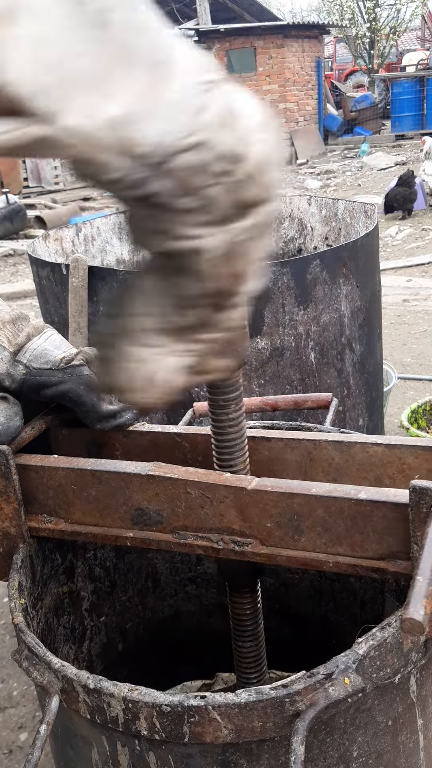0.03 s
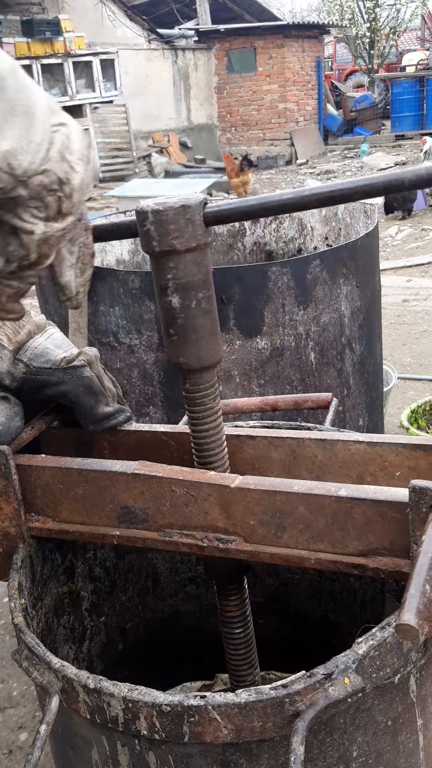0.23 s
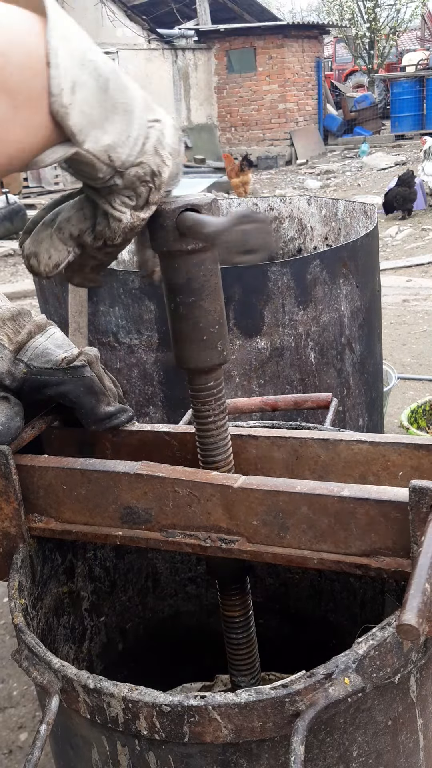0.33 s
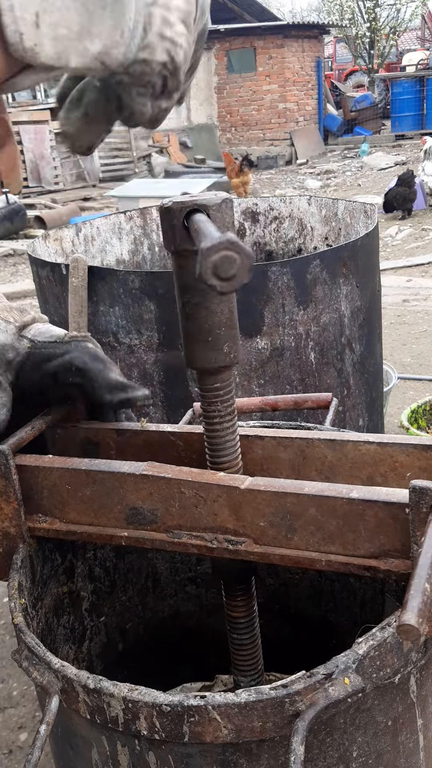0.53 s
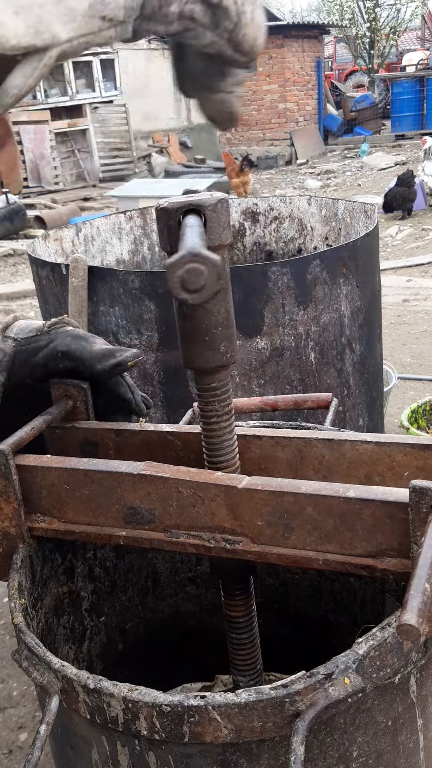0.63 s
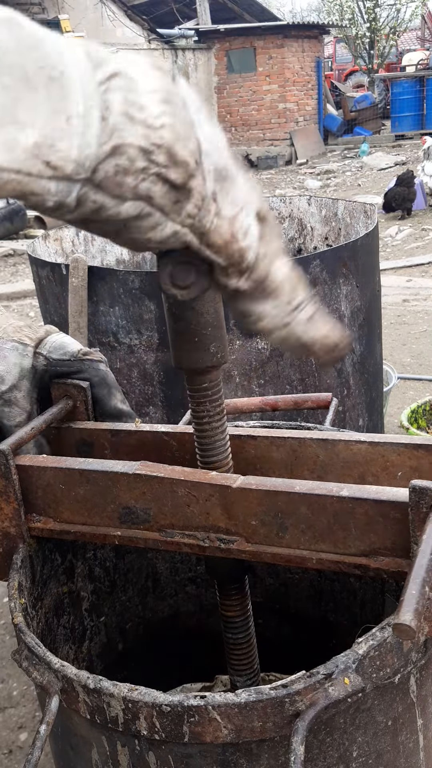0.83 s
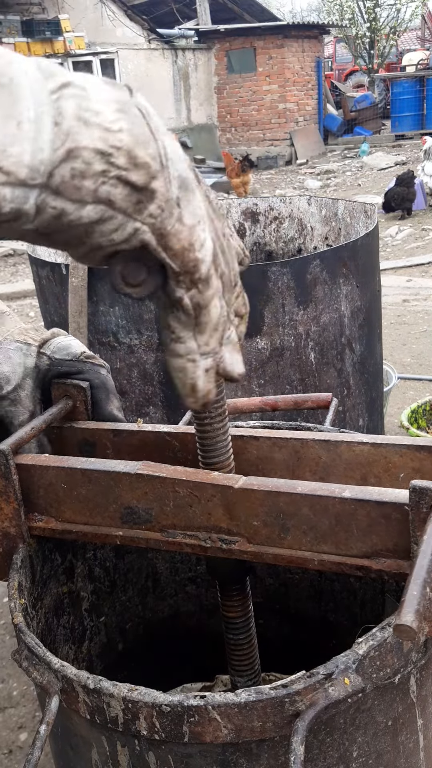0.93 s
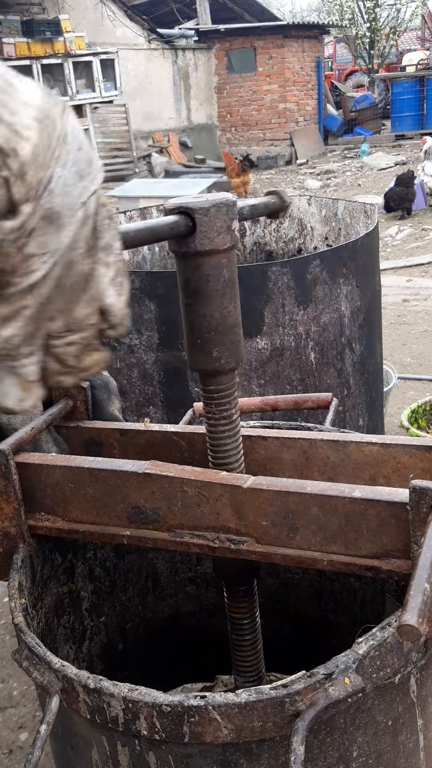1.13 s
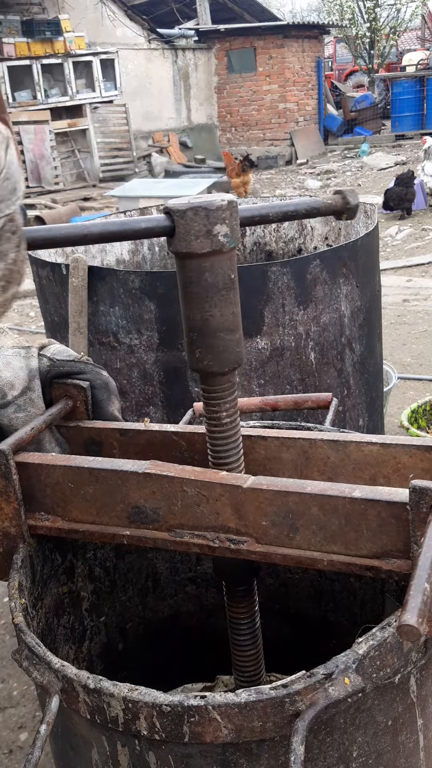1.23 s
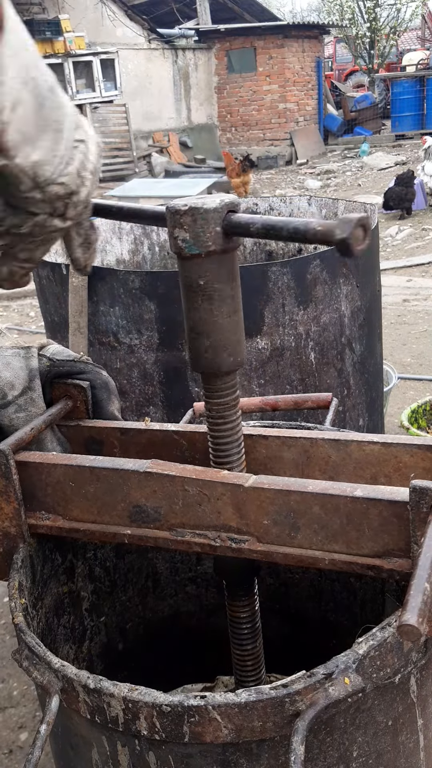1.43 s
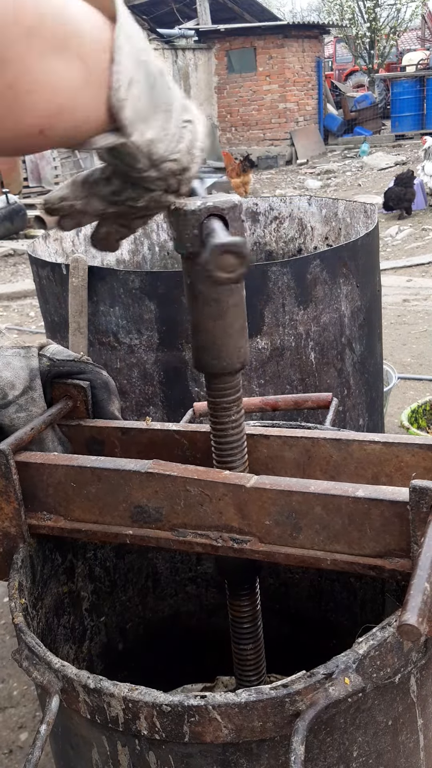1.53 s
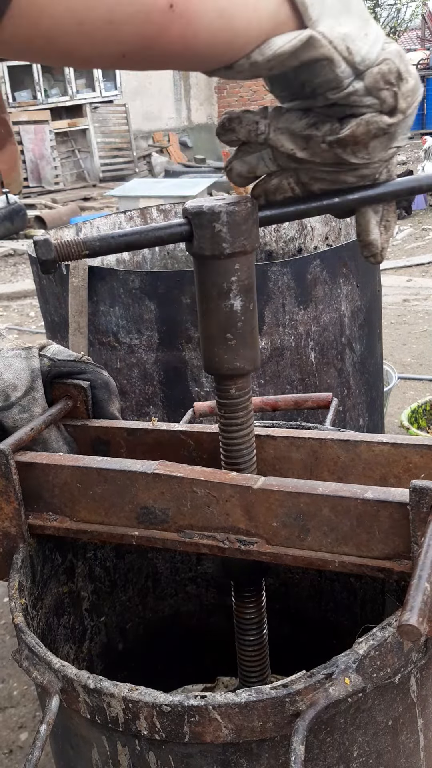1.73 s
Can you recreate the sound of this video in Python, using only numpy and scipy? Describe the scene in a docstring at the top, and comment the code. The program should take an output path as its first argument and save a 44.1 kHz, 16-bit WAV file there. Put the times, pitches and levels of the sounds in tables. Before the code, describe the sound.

A screw press's steel handle knocks and clatters dully in its socket as it spins.

```python
"""The loose bar handle of a rusty screw press knocks in its socket as a gloved hand spins it.
Each impact excites the damped modes of the steel frame, which rings dully and clatters.
Friction makes the thread grind and the glove swish close by; the drum bumps and fine ticks sound.
Under it lies a low rumble of handling or wind. A bird chirps twice over the faint hush of a farmyard."""
import sys
import numpy as np
from scipy import signal
from scipy.io import wavfile
from scipy.ndimage import uniform_filter1d

SR = 44100
rng = np.random.default_rng(int(sys.argv[2]) if len(sys.argv) > 2 else 0)


def wrap_up_sound(samples):
    """Save the sound to the file named by the first command line argument, as 16-bit audio."""
    columns = np.atleast_2d(samples).T
    # keep every value between -1 and 1, then stretch to whole-number steps
    tamed = np.clip(columns, -1, 1)
    steps = np.round(tamed * 32767).astype(np.int16)
    wavfile.write(sys.argv[1], SR, steps)


N = 79380
TIME = np.arange(N) / SR
CUTOFF_HZ = 15900
EDGES_HZ = np.geomspace(25, 17000, 23)
CENTRES_HZ = np.sqrt(EDGES_HZ[1:] * EDGES_HZ[:-1])


def from_db(db):
    """Amplitude grows tenfold for every 20 dB."""
    return 10 ** (np.asarray(db) / 20)


def panned(db):
    """A level difference between the ears gives direction; positive is to the left."""
    return from_db(db * np.array([[.5], [-.5]]))


def level_curve(rows):
    """Gain over time, interpolated in decibels."""
    return from_db(np.interp(TIME, *np.transpose(rows)))


def at_hz(points, hz):
    """Interpolation on a logarithmic frequency axis."""
    f, value = np.transpose(points)
    return np.interp(np.log(hz), np.log(f), value)


def decay(t, t60):
    """Damping lowers a vibration exponentially, by 60 dB in t60 seconds."""
    return np.exp(-np.log(1000) * t / t60)


def roughness(depth_db, rate_hz):
    """Random amplitude modulation is heard as roughness."""
    knots = rng.standard_normal(2000)
    return from_db(depth_db * np.interp(TIME * rate_hz, np.arange(len(knots)), knots))


def unit_rms(x):
    """Normalisation to unit mean power."""
    return x / np.sqrt(np.mean(x ** 2) + 1e-20)


def noise_bands(spectrum, correlation):
    """Stereo noise as (band, channel, sample); the mid-to-side ratio sets left-right correlation."""
    white, bands = rng.standard_normal((2, 2, N)), []
    gains = from_db(at_hz(spectrum, CENTRES_HZ)) * np.sqrt(np.diff(EDGES_HZ))
    alike = correlation * np.ones(len(gains))
    for k, gain in enumerate(gains / np.linalg.norm(gains)):
        band = signal.butter(2, EDGES_HZ[k:k + 2], "band", fs=SR, output="sos")
        mid, side = signal.sosfilt(band, white[k % 2])
        stereo = np.sqrt(1 + alike[k]) * mid + np.sqrt(1 - alike[k]) * np.array([side, -side])
        bands.append(gain * unit_rms(stereo))
    return np.array(bands)


def add(out, start_s, sound):
    """Superposition of a sound on the mix from its start time."""
    i = int(start_s * SR)
    out[..., i:i + sound.shape[-1]] += sound[..., :N - i]


# Each row: frequency in Hz, relative spectral density in dB.
HUSH_SPECTRUM = [(25, -16), (80, -14.5), (300, -6.5), (700, 2.5), (1500, -15), (3000, -10), (6000, -12.5),
                 (8500, -46), (15500, -44)]

def yard_hush():
    """The steady background is diffuse: it is nearly uncorrelated at the two ears."""
    return from_db(-60.5) * noise_bands(HUSH_SPECTRUM, correlation=0.11).sum(0)


# Each row: time in seconds, level in dB.
GRIND_LEVEL = [(0, -52.5), (.08, -42), (.35, -48.5), (.6, -55), (.76, -51.5), (.8, -57), (.9, -49),
               (1.02, -36.5), (1.12, -54.5), (1.28, -51.5), (1.42, -55.5), (1.6, -54), (1.8, -60.5)]
# Each row: frequency in Hz, relative spectral density in dB.
GRIND_SPECTRUM = [(150, -22.5), (320, 4), (500, 4.5), (750, -5), (1000, -2.5), (1350, -9), (2000, -19),
                  (4000, -38), (8000, -53)]
# Each row: frequency in Hz, left-right correlation of the grinding and of the frame's clatter.
PRESS_CORRELATION = [(80, 0.65), (300, 0.91), (700, 0.87), (1200, .5), (2200, 0), (4000, 0.43),
                     (10000, 0.36)]

def thread_grind():
    """Uneven friction in the rusty thread makes rough noise as the screw turns."""
    friction = noise_bands(GRIND_SPECTRUM, at_hz(PRESS_CORRELATION, CENTRES_HZ)).sum(0)
    return level_curve(GRIND_LEVEL) * unit_rms(friction * roughness(depth_db=3.5, rate_hz=110))


# Each row: time in seconds, relative level in dB.
RUMBLE_LEVEL = [(0.0, -65), (0.07, -38.5), (0.18, -44.5), (0.214, -61), (0.284, -37), (0.334, -60),
                (0.39, -38), (0.426, -47), (0.556, -39.5), (0.576, -44), (0.636, -37), (0.786, -57.5),
                (0.866, -44.5), (0.892, -46), (0.946, -43), (0.982, -62), (1.026, -38.5), (1.102, -37),
                (1.122, -47.5), (1.178, -33), (1.242, -46), (1.278, -45), (1.298, -53.5), (1.378, -39.5),
                (1.418, -54), (1.554, -46.5), (1.578, -70), (1.684, -58), (1.728, -79), (1.8, -56)]
# Each row: frequency in Hz, relative spectral density in dB.
RUMBLE_SPECTRUM = [(25, -31), (45, -9), (70, 1), (105, 3.5), (150, -5), (220, -10), (400, -16), (900, -52)]

def low_rumble():
    """Amplitude-modulated noise: the uneven low rumble of handling or wind."""
    low = noise_bands(RUMBLE_SPECTRUM, correlation=0).sum(0)
    running_power = uniform_filter1d(np.mean(low ** 2, axis=0), size=1800)
    steady = low / np.sqrt(running_power + 1e-12)
    return from_db(1) * level_curve(RUMBLE_LEVEL) * steady


# Each row: time in seconds, relative level in dB.
SWISH_LEVEL = [(0, -63), (.13, -54), (.27, -50.5), (.4, -55), (.55, -62), (.73, -65), (.87, -56),
               (.96, -63), (1.0, -56.5), (1.05, -47), (1.1, -61), (1.22, -55), (1.39, -59), (1.5, -58.5),
               (1.63, -56.5), (1.76, -66.5)]
# Each row: frequency in Hz, relative spectral density in dB.
SWISH_SPECTRUM = [(700, 4), (2000, -2), (4000, -1.5), (6500, -4), (8200, -8.5), (10500, -6.5),
                  (15500, -9.5)]

def glove_swish():
    """Sliding friction of cloth on steel gives a fine, grainy broadband hiss."""
    hiss = noise_bands(SWISH_SPECTRUM, correlation=0).sum(0) * roughness(depth_db=1.5, rate_hz=460)
    return from_db(-0.5) * level_curve(SWISH_LEVEL) * hiss * panned(1.5)


def knock_gain(knock, hz):
    """The spectrum of an impact sets how strongly each frequency is excited, left and right."""
    _, db, thud, clang, click, pan_db, _ = knock
    colour_db = at_hz([(350, thud), (700, 0), (1300, clang), (3730, click)], hz)
    return panned(pan_db) * from_db(db + colour_db)


RATTLE, SLAM, CLANK, CLUNK, CLINK = range(5)   # ways the bar meets its socket
# Each row: start in seconds, relative level in dB, extra thud, clang and click in dB, pan in dB,
# kind of contact.
BAR_KNOCKS = [(0.024, -46.5, 13, -30, 8, -4, RATTLE), (0.065, -36.5, -3, 0, 7, -1.5, RATTLE),
              (0.112, -55.5, 13, -15, -2, 7, RATTLE), (0.134, -43.5, -10, -12, 13, -2.5, RATTLE),
              (0.159, -30, 5.5, -5.5, -2, -1.5, RATTLE), (0.207, -23, -4.5, 4, -1.5, -2.5, SLAM),
              (0.218, -16, 3, -5, 0.5, -2, SLAM), (0.236, -10.5, -4.5, 0, -1, 0, SLAM),
              (0.249, -15.5, -27, -8, -10, -3, SLAM), (0.314, -31, 2, -10.5, -2.5, 10, RATTLE),
              (0.384, -59, 18, -15, -8.5, 0, RATTLE), (0.418, -39.5, 6, -3, -6, -1, RATTLE),
              (0.441, -50, 15, -17, -9, -9, RATTLE), (0.469, -43, 6, 1, 3, 4, RATTLE),
              (0.481, -40, 8.5, -6, -10, -7, RATTLE), (0.497, -30.5, 2.5, 0.5, -17, 2.5, RATTLE),
              (0.534, -39, 6, 7, 6, 0.5, CLINK), (0.555, -22, -2, -2.5, -8.5, -0.5, RATTLE),
              (0.576, -43, 1, -17, -6, 3, RATTLE), (0.614, -31.5, 1.5, -9.5, -15, 2, RATTLE),
              (0.659, -39, 15.5, -9, -15, 2, RATTLE), (0.696, -50.5, 18.5, -10, -5, -2, RATTLE),
              (0.721, -34.5, 10.5, -3.5, -13, -1, RATTLE), (0.736, -45.5, 5, -2, -18, -2, RATTLE),
              (0.76, -48.5, 7, -6, -14, -8, RATTLE), (0.861, -52.5, -6, 8.5, 5, -1, RATTLE),
              (0.923, -29.5, 5, 4.5, -2, 2.5, RATTLE), (0.965, -21.5, 4, 11, 7.5, -0.5, CLANK),
              (0.987, -39.5, -12, -2, 13, -5, CLANK), (1.112, -42, -4, -6, -5, 1, RATTLE),
              (1.165, -52, 17.5, 7, 1, 1, RATTLE), (1.4405, -24, -1.5, -2.5, -11, -0.5, CLUNK),
              (1.657, -40.5, 0.5, -5, -3, -1, CLUNK), (1.781, -27.5, 0, -6, -5.5, 0, CLUNK)]
# Each row: frequency of a mode of the bar, screw and frame in Hz, 60 dB decay time in seconds,
# relative level in dB for each of the five kinds of contact.
FRAME_MODES = [(295.2, 0.17, -9.5, -11, -7.5, -11, -8), (332.3, 0.1, -6, -2.5, -6.5, -4, -22),
               (381.7, 0.11, -10, -15, -6, -11.5, -12), (516, 0.03, -17, -30, -5, 2.5, -15),
               (590.4, 0.077, -19, -18, -1, 2.5, -14), (626.3, .11, -11, -13.5, -6, -5, -17),
               (701, 0.096, -2.5, -5.5, -23, -5.5, -1), (740.6, .11, -11.5, -5.5, -10.5, -11.5, -16),
               (874.7, 0.096, -9, -9, -25, -14, -11), (1085, 0.099, -14, -4, -22, -29, -24),
               (1244, 0.085, -6, -24, -6, -6.5, -17), (1300, 0.091, -8, -3, -10, -6, -5.5),
               (1365, 0.16, -11, -9.5, -23, -4, -4), (1586, 0.15, -33, -39, -8.5, -22, -22),
               (1870, .11, -17.5, -17, -16.5, -39, -22), (1970, 0.13, -15.5, -27, -18, -13, -37),
               (2350, 0.14, -26, -23, -25, -26, -24), (2615, 0.082, -29, -18, -27, -35, -28),
               (2820, 0.076, -19, -52, -19, -33, -24), (3600, 0.046, -22, -13, -24, -26, -5),
               (3870, 0.066, -19, -22, -34, -15, -24), (4440, 0.052, -31, -20, -16, -17, -29)]

def frame_ring():
    """Modal vibration: each knock rings damped sinusoids that reach the two ears out of phase."""
    hz, t60, *contact_db = np.transpose(FRAME_MODES)
    t, out = TIME[:SR // 3], np.zeros((2, N))
    ring_db, spread_db, rise_s = 2, 1.5, 0.0038
    polarity = (-1) ** np.arange(len(hz))
    lead_rad = np.minimum(0.6 * hz / 1000, 0.89) * polarity
    phase = 2 * np.pi * hz[:, None] * t
    envelope = decay(t, t60[:, None]) * (1 - np.exp(-t / rise_s))
    rings = np.array([envelope * np.sin(phase + side * lead_rad[:, None]) for side in (1, -1)])
    for knock in BAR_KNOCKS:
        start, *_, contact = knock
        mode_db = ring_db + contact_db[contact] + spread_db * rng.standard_normal(len(hz))
        gains = knock_gain(knock, hz) * from_db(mode_db) * polarity
        add(out, start, np.einsum("cm,cmn->cn", gains, rings))   # sum over modes
    return out


# Each row: frequency in Hz, relative spectral density in dB.
CLATTER_SPECTRUM = [(50, -22.5), (150, -11.5), (230, -12), (320, -1), (480, -5), (700, -2.5), (1000, -9),
                    (1300, -10), (1750, -16.5), (2600, -20.5), (4300, -23), (5500, -32), (8000, -26),
                    (15000, -33)]
# Each row: frequency in Hz, 60 dB decay time in seconds.
CLATTER_T60 = [(100, 0.42), (350, .11), (1300, 0.098), (4000, 0.081), (12000, 0.071)]

def frame_clatter():
    """Modal overlap: dense, quickly damped modes merge into noise, with a faint echo in the yard."""
    t, power = TIME[:SR // 2], np.zeros((len(CENTRES_HZ), N))
    rise_s = 0.0014
    direct = decay(t, at_hz(CLATTER_T60, CENTRES_HZ)[:, None])
    yard_echo = from_db(-18.5) * decay(t, t60=0.34)
    knock_power = (direct ** 2 + yard_echo ** 2) * (1 - np.exp(-t / rise_s)) ** 2
    for knock in BAR_KNOCKS:   # incoherent sounds add in power
        gains = knock_gain(knock, CENTRES_HZ).mean(0)
        add(power, knock[0], gains[:, None] ** 2 * knock_power)
    bands = noise_bands(CLATTER_SPECTRUM, at_hz(PRESS_CORRELATION, CENTRES_HZ))
    clatter = np.einsum("bn,bcn->cn", np.sqrt(power), bands)   # sum over bands
    lowpass = signal.butter(4, 4260, fs=SR, output="sos")
    return from_db(-1) * signal.sosfilt(lowpass, clatter)


# Each row: start in seconds, level in dB, frequency in Hz.
DRUM_BUMPS = [(0.268, -34, 90.6), (1.018, -22.5, 106.5), (1.081, -30, 97.6), (1.165, -30, 122),
              (1.363, -33, 102.5), (1.529, -41, 99)]

def drum_bumps():
    """A damped oscillator: the drum of the press rocks under the hand with a short, deep ring."""
    t, out = TIME[:SR // 3], np.zeros(N)
    rise_s = 0.0038
    envelope = decay(t, t60=0.15) * (1 - np.exp(-t / rise_s))
    for start, db, hz in DRUM_BUMPS:
        add(out, start, from_db(db) * np.sin(2 * np.pi * hz * t) * envelope)
    return out


# Each row: start in seconds, level in dB, nominal band centre in Hz, pan in dB.
SHARP_TICKS = [(0.782, -53.5, 11000, 4), (0.811, -59, 7000, 3), (0.967, -45.5, 9800, -2),
               (1.144, -43, 2160, -7), (1.213, -55, 9900, 3), (1.483, -67, 11000, 0)]

def sharp_ticks():
    """Broadband transients: fine, bright ticks, and the sharp crack of the bar's clank."""
    t, out = TIME[:SR // 20], np.zeros((2, N))
    for start, db, hz, pan_db in SHARP_TICKS:
        band = signal.butter(1, [hz / 2, min(hz * 2, CUTOFF_HZ)], "band", fs=SR, output="sos")
        crack = unit_rms(signal.sosfilt(band, rng.standard_normal((2, len(t)))))
        add(out, start, from_db(db) * panned(pan_db) * crack * decay(t, t60=0.021))
    return out


# Each row: start in seconds, relative level in dB.
CHIRPS = [(0.814, -30), (0.854, -46)]
# Each row: time into the chirp in seconds, frequency in Hz, relative level in dB.
CHIRP_GLIDE = [(0, 2120, -30), (.007, 2504, -8), (.016, 2736, -2.5), (.020, 3490, -2), (.024, 3750, -8.5),
               (0.028, 4350, -28)]

def bird_chirps():
    """Frequency sweeps: rising whistles with a weak octave reverberate between the yard's walls."""
    times, hz, db = np.transpose(CHIRP_GLIDE)
    t, direct = TIME[:int(times[-1] * SR)], np.zeros(N)
    phase = 2 * np.pi * np.cumsum(np.interp(t, times, hz)) / SR
    whistle = np.sin(phase) + from_db(-23.5) * np.sin(2 * phase)
    chirp = from_db(np.interp(t, times, db)) * whistle
    for start, level_db in CHIRPS:
        add(direct, start, from_db(level_db) * chirp)
    wall_response = rng.standard_normal((2, SR // 3)) * decay(TIME[:SR // 3], t60=0.18)
    wall_response /= np.linalg.norm(wall_response, axis=1, keepdims=True)
    echo = signal.fftconvolve(direct[None], wall_response)[:, :N]
    return direct + from_db(-6.5) * echo


def rust_scrape():
    """Dry friction at one patch of rust in the thread gives a faint, brief rasp."""
    peak_s, half_width_s = 1.277, 0.044
    band = signal.butter(2, (1200, 2150), "band", fs=SR, output="sos")
    friction = signal.sosfilt(band, rng.standard_normal((2, N)))
    rasp = unit_rms(friction * roughness(depth_db=3.5, rate_hz=150))
    return from_db(-55.5) * rasp * np.exp(-((TIME - peak_s) / half_width_s) ** 2)


def scene():
    """Superposition: the sound pressures of all the sources add."""
    hush = yard_hush()
    knocks = frame_ring() + frame_clatter()
    press = knocks + thread_grind() + rust_scrape() + sharp_ticks() + drum_bumps()
    return hush + press + low_rumble() + glove_swish() + bird_chirps()


def record(dry):
    """Band limiting: a steep elliptic low-pass removes the highest treble."""
    return signal.sosfilt(signal.ellip(12, .2, 80, CUTOFF_HZ, fs=SR, output="sos"), dry)


dry = scene()
out = record(dry)
wrap_up_sound(out)
```